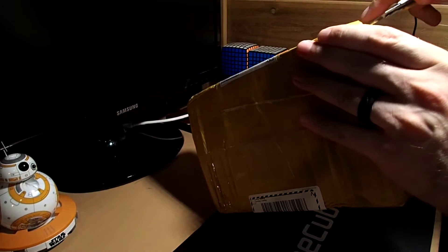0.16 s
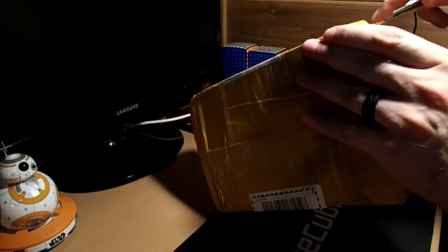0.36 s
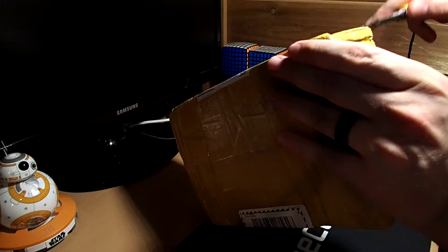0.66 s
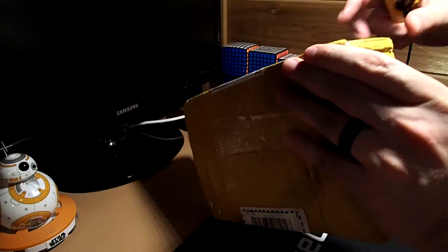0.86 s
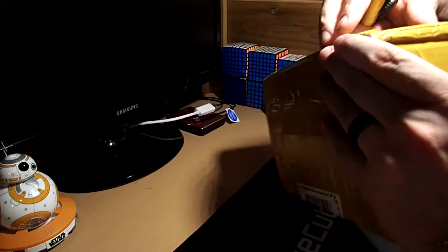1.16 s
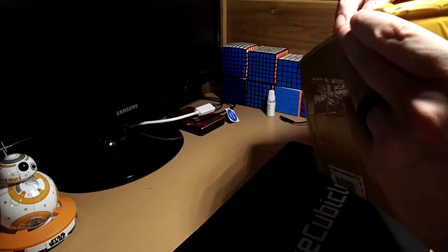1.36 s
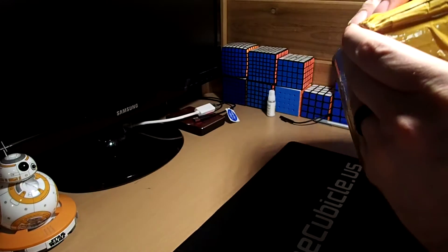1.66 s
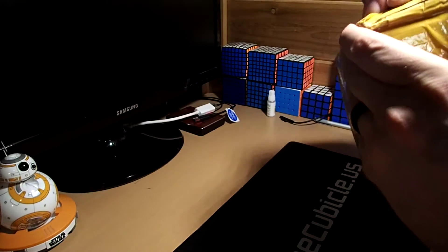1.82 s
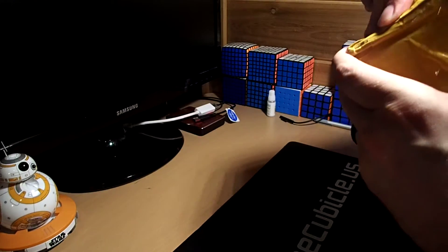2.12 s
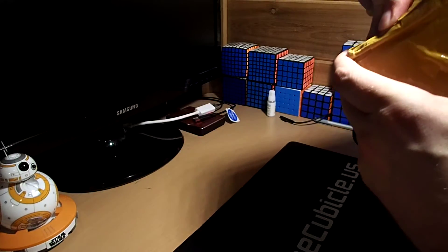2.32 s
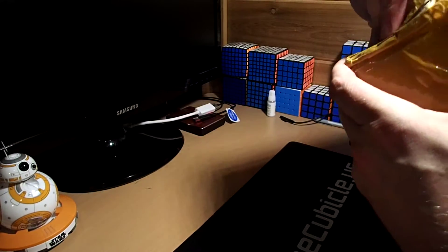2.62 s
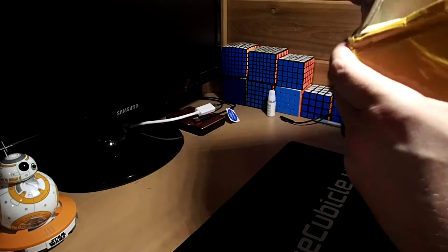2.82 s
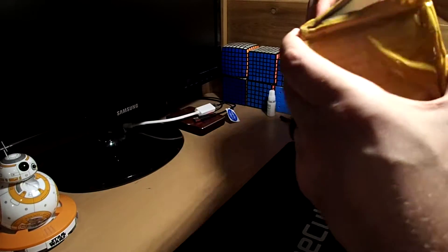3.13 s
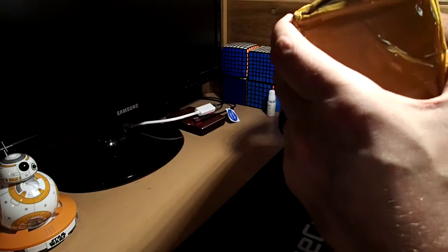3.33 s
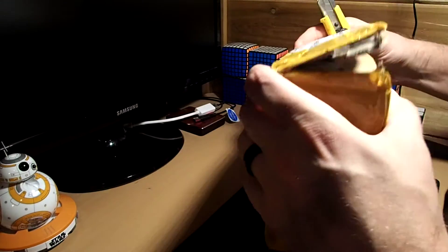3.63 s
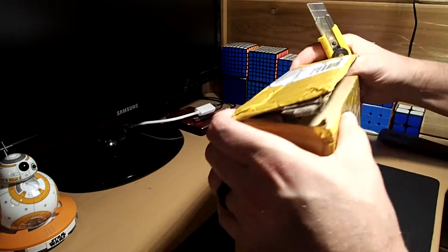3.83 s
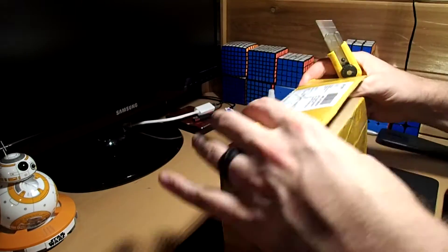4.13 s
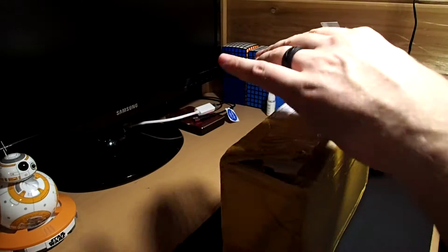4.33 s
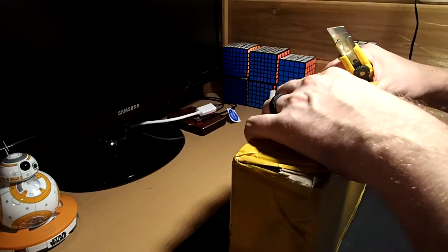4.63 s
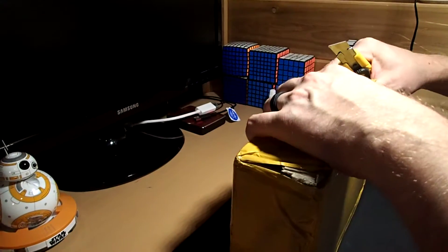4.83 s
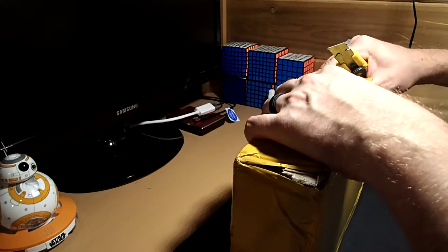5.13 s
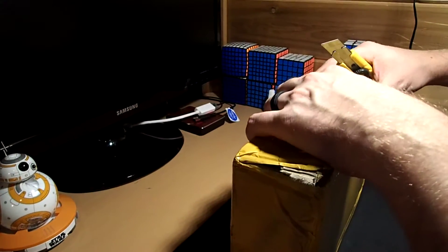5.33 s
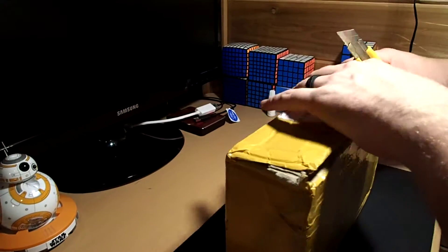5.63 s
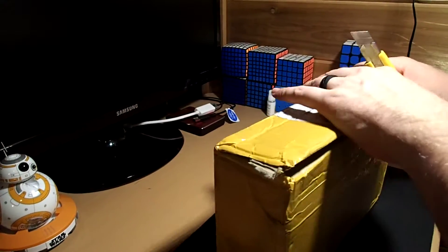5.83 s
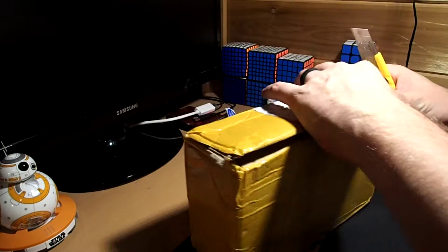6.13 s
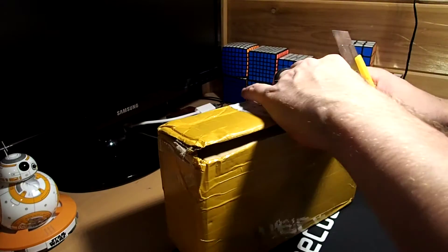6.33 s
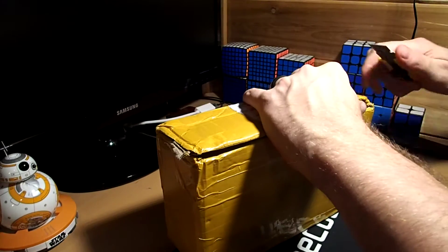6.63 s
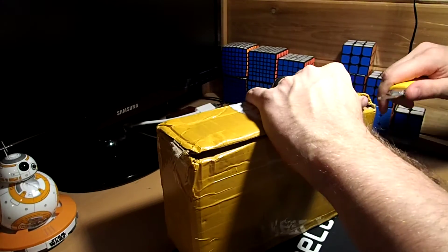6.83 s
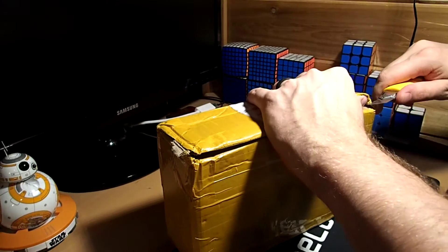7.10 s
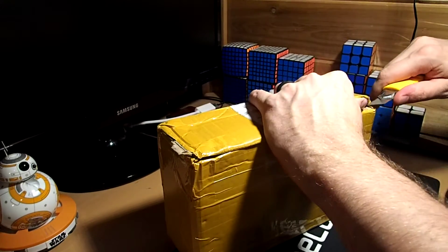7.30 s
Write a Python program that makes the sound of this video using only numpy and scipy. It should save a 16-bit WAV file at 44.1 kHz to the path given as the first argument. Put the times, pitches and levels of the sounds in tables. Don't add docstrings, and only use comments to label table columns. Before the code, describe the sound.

Close to a small stereo microphone in a small room, a blade rips packing tape on a cardboard box: a short tear, scattered snaps, a hard hollow knock, then a denser crackling rip. Hands rustle and slide over the tape. The box bumps softly onto a desk with dry pops, a folded flap creaks slower and slower, and light blade clinks and snaps finish. A faint computer fan runs throughout.

```python
import sys
import numpy as np
from scipy import signal
from scipy.fft import rfft, irfft
from scipy.io import wavfile
from scipy.ndimage import uniform_filter1d

SR = 44100
rng = np.random.default_rng(int(sys.argv[2]) if len(sys.argv) > 2 else 0)


def store_pcm(level_fs):
    pcm = np.round(np.clip(level_fs, -1, 1) * 32767).astype(np.int16)
    wavfile.write(sys.argv[1], SR, np.atleast_2d(pcm).T)


def boost_factor(decibels):
    exponent = np.asarray(decibels, float) / 20
    return 10 ** exponent


N = 328986


def unit(x):
    return x / np.sqrt(np.mean(x ** 2))


def colour(x, points):
    hz, db = np.transpose(points)
    bins = np.maximum(np.arange(1025) * SR / 2048, 1)
    cep = irfft(np.log(boost_factor(np.interp(np.log(bins), np.log(hz), db))))
    cep[1:1024] *= 2
    cep[1025:] = 0
    return signal.fftconvolve(x, irfft(np.exp(rfft(cep))))[:len(x)]


def ring(x, modes):
    out = 0
    for k, (hz, width, db) in enumerate(modes):
        b, a = signal.iirpeak(hz, hz / width, fs=SR)
        out = out + (-1) ** k * boost_factor(db) * signal.lfilter(b, a, x)
    return out


def curve(tables, column):
    t = np.arange(N) / SR
    return sum(boost_factor(np.interp(t, rows[:, 0], rows[:, column], -200, -200)) for rows in map(np.array, tables))


def soft_curve(tables):
    return uniform_filter1d(curve(tables, column=1), size=200)


def swells(rows, start_db, end_db):
    return [[(s, a + start_db, b), (s + swell, a, b), (s + swell + fade, a + end_db, b)]
            for s, swell, fade, a, b in rows]


def walk(rate):
    k = int(SR / rate)
    return uniform_filter1d(np.repeat(rng.standard_normal(N // k + 1), k), k)[:N]


def slips(rate, spread_db):
    when = rng.random(N) < rate / SR
    size_db = spread_db * np.minimum(rng.exponential(size=N), 4.5)
    return unit(when * rng.standard_normal(N) * boost_factor(size_db))


def add(track, s, sound):
    i = int(s * SR)
    track[i:i + len(sound)] += sound[:len(track) - i]


def knock(hz, cycles):
    t = np.arange(12000) / SR
    return np.sin(2 * np.pi * hz * t) * np.exp(-t * hz / cycles)


# frequency in Hz, level in dB.
TAPE_TONE = [(1500, -19.5), (2000, -29.5), (3000, -18.5), (4000, -30), (4500, -10), (4850, -7.5),
             (5200, 2.5), (5800, -2.5), (6400, -8.5), (7000, -11.5), (8100, -9), (9200, -21),
             (15300, -32.5), (16200, -24)]


def film(x):
    return colour(x, [(300, -54)] + TAPE_TONE)


# frequency in Hz, width in Hz, level in dB.
BOX_MODES = [(309, 106, 2), (547.5, 79, 2.5), (770, 180, 0.5), (1063, 163, 0), (1282, 180, 0),
             (1520, 235, 2), (2170, 72, -14), (1660, 450, -25.5), (2416, 190, -11), (2850, 240, -13),
             (3900, 500, -23)]
# frequency in Hz, width in Hz, level in dB.
BLADE_MODES = [(2200, 280, -1.5), (3550, 1100, -9)]
# frequency in Hz, level in dB.
SURFACE_TONE = [(3000, -30), (8000, -6), (10000, 0), (15500, -3), (16300, -30)]
SNAP_HZ, BLADE_JAR_DB = 885, -21


def releases(events, shadow=None):
    tape, box, push, steel = np.zeros((4, N))
    t = np.arange(4000) / SR
    for s, db, box_db, hz, blade_db, tail_s in events:
        crack = 0.35 * np.exp(-t / 0.00035)
        crackle = 0.5 * np.exp(-t * np.log(1000) / max(tail_s, 0.005))
        burst = rng.standard_normal(len(t)) * (crack + crackle)
        burst = burst + 2.6 * (t == 0)
        add(tape, s, boost_factor(db) * burst)
        add(push, s, boost_factor(db + box_db) * burst)
        add(steel, s, boost_factor(db + blade_db) * burst)
        add(box, s, boost_factor(db + box_db - 1.5) * knock(hz, cycles=4.0))
        add(box, s, boost_factor(db + box_db - 2.0) * knock(3100, cycles=0.68))
    if shadow:
        tape = boost_factor(11) * film(colour(tape, shadow))
    else:
        tape = boost_factor(11) * film(tape) + boost_factor(-19.0) * colour(tape, SURFACE_TONE)
    return tape + boost_factor(17.5) * ring(push, BOX_MODES) + boost_factor(2.5) * ring(steel, BLADE_MODES) + box


# frequency in Hz, level in dB.
AIR_TONE = [(20, -10), (110, -3.5), (400, -9.5), (700, -14), (1650, -19.5), (1900, -25), (3900, -34.5),
            (4800, -27), (5250, -16.5), (6500, -23), (8000, -18.5), (9300, -24.5), (15500, -28),
            (16500, -68)]
# frequency in Hz, side level in dB over mid.
AIR_SIDE_TONE = [(30, -8), (250, -4.5), (500, -3), (1400, -2), (3000, -2.5), (7000, -1.5), (15000, 0)]
# frequency in Hz, rms level in dB.
FAN_TONES = [(522, -52), (409.7, -63), (117.4, -63), (64, -64.5)]
AIR_DB = -46


def air():
    mid, side = (unit(colour(rng.standard_normal(N), AIR_TONE)) * boost_factor(AIR_DB - 4.5 + 0.93 * walk(1.826))
                 for _ in range(2))
    t = np.arange(N) / SR
    wobble_s = 0.000844 * np.cumsum(walk(4.24)) / SR
    tones = np.zeros(N)
    for hz, db in FAN_TONES:
        level = np.sqrt(2) * boost_factor(db + 0.55 * walk(9.8))
        tones += level * np.sin(2 * np.pi * hz * (t + wobble_s))
    return mid + tones, colour(side, AIR_SIDE_TONE) + 0.013 * tones


# start in seconds, level in dB.
CRACKLE_TIMES = [(0.045, -29), (0.2643, -31), (0.8162, -28), (1.0287, -32.5), (1.533, -31), (1.933, -42),
                 (1.9782, -35), (2.333, -33), (2.349, -27.5), (2.411, -34.5), (2.5005, -27), (2.87, -33.5),
                 (3.185, -39), (3.9672, -30), (4.4006, -34), (4.4525, -28), (4.601, -30), (5.5042, -32),
                 (5.694, -28), (6.0621, -32.5)]


def crackles():
    return releases([(s, db, -31, SNAP_HZ, BLADE_JAR_DB, 0.046) for s, db in CRACKLE_TIMES])


# start in seconds, swell in seconds, fade in seconds,
# tape rustle in dB, box rustle in dB.
HAND_MOVES = [(0.05, 0.11, 0.26, -46, -48), (0.27, 0.13, 0.091, -50.5, -42), (0.55, 0.35, 0.17, -50, -64),
              (1.3, 0.28, 0.17, -51, -53), (1.58, 0.15, 0.26, -42.5, -47.5), (1.93, 0.21, 0.45, -47, -56),
              (2.56, 0.11, .1, -50, -59), (2.76, 0.19, 0.11, -43, -51), (3.0, 0.21, 0.33, -44.5, -48),
              (3.36, 0.17, 0.11, -44.5, -43), (3.46, 0.14, 0.25, -44.5, -47.5),
              (3.66, 0.26, 0.38, -47.5, -76), (3.95, 0.11, 0.1, -65, -45.5), (4.3, 0.21, 0.16, -42, -47.5),
              (4.42, 0.23, 0.16, -38, -38.5), (4.66, 0.13, 0.22, -39.5, -56),
              (5.13, 0.16, 0.23, -38, -42.5), (5.3, 0.2, 1, -46, -58), (5.72, 0.32, 0.17, -49.5, -61),
              (6.45, 0.34, 0.15, -46.5, -54), (7.12, 0.2, 0.16, -40, -44)]


def grip():
    skin = slips(9000, spread_db=1.7) * boost_factor(3.6 * walk(70))
    start_db, end_db = -21.5, -25
    on_tape = [(s, swell, fade, tape_db, 0) for s, swell, fade, tape_db, _ in HAND_MOVES]
    on_box = [(s, swell, fade, box_db, 0) for s, swell, fade, _, box_db in HAND_MOVES]
    rustle = soft_curve(swells(on_tape, start_db, end_db)) * unit(film(skin))
    rustle = rustle + soft_curve(swells(on_box, start_db, end_db)) * unit(ring(skin, BOX_MODES))
    return boost_factor(-3.0) * rustle


# time in seconds, tearing in dB,
# depth into the card as box level in dB over tearing.
RIP_CURVES = [
    [(0.28, -57, 1), (0.345, -33, -3.5), (0.362, -25.5, -6.5), (0.4, -22, -3), (0.44, -20.5, -12),
     (0.458, -18, -3.5), (0.471, -27, 4), (0.478, -43, -8), (0.49, -48, -10)],
    [(2.61, -40, -25), (2.616, -18, -17), (2.638, -16.5, -14), (2.65, -26.5, -10), (2.665, -22.5, -4),
     (2.68, -18, -8), (2.71, -25, -8), (2.722, -33.5, -10), (2.774, -45.5, -26)],
]
# start in seconds, swell in seconds, fade in seconds,
# level in dB, box level in dB over tearing.
SCRAPE_MOVES = [
    (0.135, 0.038, 0.051, -34.5, 0),
    (0.48, 0.009, 0.14, -40.5, -3.5),
    (3.99, 0.035, 0.02, -32, -7.5),
    (4.105, 0.024, 0.054, -42, -4.5),
]
# start in seconds, swell in seconds, fade in seconds,
# level in dB, box level in dB over tearing.
SLIDE_MOVES = [
    (2.335, 0.021, 0.13, -42.5, -32),
    (2.483, 0.033, 0.064, -35, -13),
    (3.28, 0.019, 0.071, -45, -5),
    (3.32, 0.05, .025, -47, -2),
]
# start in seconds, swell in seconds, fade in seconds,
# level in dB, box level in dB over tearing.
GLIDE_MOVES = [
    (3.04, 0.11, 0.071, -34.5, -10),
    (4.11, 0.021, 0.026, -37, -2.5),
    (5.93, 0.16, .26, -45.5, -24),
]
# share of distinct slips from 0 to 1, hiss in dB over tearing.
GRAIN_KINDS = [
    (0.41, -29),
    (0.69, -15),
    (0.25, -23),
    (0.74, -1.5),
    (0.42, -6),
]
# time in seconds, level in dB.
TAUT_CURVE = [
    (0.38, -40),
    (0.42, -32),
    (0.442, -28),
    (0.462, -35),
    (0.474, -41),
]


def strokes():
    kinds = [RIP_CURVES[:1], RIP_CURVES[1:]]
    kinds += [swells(rows, start_db=-16.5, end_db=-11) for rows in (SCRAPE_MOVES, SLIDE_MOVES)]
    kinds += [swells(GLIDE_MOVES, start_db=-13.5, end_db=-4.5)]
    tearing = np.array([soft_curve(kind) for kind in kinds])
    card = soft_curve([[(s, db + box_db) for s, db, box_db in cut] for kind in kinds for cut in kind])
    share, hiss_db = np.transpose(GRAIN_KINDS)
    rough = share[tearing.argmax(axis=0)]
    jerky = unit(slips(3500, spread_db=1.5) * boost_factor(4.0 * walk(250) + 0.8 * walk(40)))
    blade = rough * jerky + (1 - rough) * rng.standard_normal(N)
    out = tearing.sum(axis=0) * unit(film(blade))
    out = out + card * unit(ring(blade, BOX_MODES))
    out = out + soft_curve([TAUT_CURVE]) * unit(ring(blade, [(5850, 900, 0)]))
    hiss = boost_factor(-9.0) * (boost_factor(hiss_db) @ tearing) * unit(colour(blade, SURFACE_TONE))
    return out + hiss


# start in seconds, level in dB,
# box knock in dB over tape, knock pitch in Hz.
KNOCK_HITS = [(0.1437, -26.5, -4.5, 1520), (0.18, -22, -14.5, 1410), (0.3068, -33, -12, 1410),
              (0.4596, -5.5, -6.5, 1370), (0.4622, -14.5, -8, 1560), (0.7226, -40, -3, 1370),
              (1.102, -39.5, -8, 855), (1.2382, -28, -13.5, 1690), (1.4124, -18, -6, 1555),
              (1.7265, -36.5, -7, 870), (2.2204, -0.5, -9.5, 1630), (2.2216, -21.5, 5.5, 1630),
              (2.6717, -19, -1, 710), (3.4627, -26, -16, 1010), (4.0091, -18.5, -15.5, 800),
              (4.0935, -31, -2, 785), (4.6168, -19.5, -14, 715), (4.6462, -22, -13, 770),
              (4.7031, -39, -8, 794), (4.8345, -27, -9, 676), (4.8763, -29, -9.5, 1230),
              (4.9137, -29, -9, 665), (5.242, -32.5, -5, 1210), (5.2955, -34, -10, 1634),
              (5.3119, -23.5, -13, 1060), (6.3792, -39, 2.5, 1480), (6.3955, -38.5, -4, 1150),
              (6.427, -44, -10, 1900), (6.503, -36.5, -6, 800), (6.514, -35, -3, 1520),
              (6.5178, -28, -8, 1690), (6.6318, -36.5, -7.5, 1500), (7.0274, -44, -4, 910)]


def knocks():
    events = []
    for s, db, box_db, hz in KNOCK_HITS:
        tail_s = 0.055 * boost_factor(-0.7968 * (max(db, -32) + 31.5))
        events.append((s, db, box_db, hz, BLADE_JAR_DB, tail_s))
    return releases(events)


# start in seconds, level in dB, box knock in dB over tape, tail in seconds.
SNAP_HITS = [(0.2431, -22.5, -25, 0.058), (1.451, -23, -25, 0.039), (1.5228, -17.5, -24, 0.02),
             (1.5525, -24.5, -33, .008), (1.4219, -22, -17, 0.018), (1.2423, -30, -21, 0.044),
             (1.7967, -24, -42, 0.023), (2.5188, -17, -21, 0.023), (2.53, -18.5, -32, 0.041),
             (2.572, -28.5, -18, 0.063), (2.5875, -26.5, -22, 0.11), (2.6137, -4, -36, .02),
             (2.6226, -9.5, -26, 0.025), (2.6359, -5.5, -20, 0.056), (2.6335, -14.5, -6.5, 0.012),
             (2.7814, -19, -40, 0.013), (0.4245, -9.5, -17, .03), (0.4355, -23, -27, 0.019),
             (0.4392, -13, -30, 0.032), (2.611, -22, -28, .03), (2.6455, -15, -20, 0.025),
             (2.654, -12, -25, 0.027), (2.6763, -14, -24, .03), (2.679, -11, -24, 0.027),
             (2.6865, -13, -16, 0.034), (2.695, -18, -18, .03), (2.7075, -19, -16, 0.029),
             (2.716, -24, -17, .02), (6.4727, -29, -30, 0.018), (6.604, -37, -15, .09),
             (6.763, -28.5, -11, 0.034), (7.3191, -15, -19.5, 0.027), (4.9355, -16.5, -24, 0.026),
             (4.9741, -18, -19.5, 0.078), (5.347, -25, -32, 0.019), (5.678, -23, -37, .03),
             (7.098, -25, -31, 0.026), (7.3283, -23.5, -20, 0.038), (7.344, -28, -20, 0.028)]


def snaps():
    return releases([(s, db, box_db, SNAP_HZ, BLADE_JAR_DB, tail_s) for s, db, box_db, tail_s in SNAP_HITS])


# start in seconds, level in dB, pitch in Hz, decay in cycles.
DESK_BUMPS = [(0.34, -41, 129, 5), (0.399, -39, 150, 4), (0.45, -30, 135, 3.1), (2.221, -39, 157, 1.7),
              (4.975, -41, 89, 1.9), (4.011, -30, 66, 0.87), (4.029, -22, 92, 1.6), (4.058, -27, 67.6, 2),
              (4.094, -28, 78, 1.2), (4.109, -29, 66.4, 1.3), (4.135, -36, 55, 1.3),
              (4.162, -36, 120.6, 2.5), (4.217, -37, 59.3, 1.6), (4.484, -30.5, 99, 1.4),
              (4.548, -39, 123.3, 6.1), (4.618, -41, 82.4, 13), (4.7, -33.5, 96.4, 2.2),
              (4.786, -32, 114.6, 2.5), (5.789, -43.5, 122.4, 5.2)]


def desk():
    top = np.zeros(N)
    for s, db, hz, cycles in DESK_BUMPS:
        sound = knock(hz, cycles) + 0.48 * knock(1.7 * hz, 1.43 * cycles)
        onset = 1 - np.exp(-np.arange(len(sound)) / SR / 0.0017)
        add(top, s, boost_factor(db + 4.0) * sound * onset)
    top = signal.lfilter(*signal.butter(2, 45, "high", fs=SR), top)
    rattling = top * (1 + 0.44 * walk(250))
    return uniform_filter1d(uniform_filter1d(rattling, size=90), size=60)


# start in seconds, level in dB, pitch in Hz.
BOX_TAPS = [(0.456, -16, 363), (0.565, -30, 600), (1.494, -27.5, 413), (1.886, -37, 1050), (2.22, -12, 944),
            (3.284, -32, 988), (3.3, -33, 340), (3.48, -28.5, 322), (3.503, -32, 367), (3.571, -29, 480),
            (3.61, -33, 515), (4.009, -26.5, 276), (5.231, -26.5, 613), (5.321, -31.5, 474),
            (5.521, -32.5, 382), (6.514, -37, 522)]


def taps():
    box, push = np.zeros((2, N))
    for s, db, hz in BOX_TAPS:
        add(box, s, boost_factor(db + 2.5) * knock(hz, cycles=1.23))
        add(push, s, boost_factor(db - 12.5) * np.hanning(12))
    return boost_factor(17.5) * ring(push, BOX_MODES) + box


# start in seconds, level in dB, pitch in Hz, fade in seconds.
WALL_SHIVERS = [
    (2.223, -41.5, 1430, 0.3),
    (2.675, -18.5, 773, 0.092),
    (1.249, -36.5, 1610, 0.042),
    (1.3, -34, 700, .04),
    (4.23, -38.5, 309, 1),
]


def shivers():
    out = np.zeros(N)
    t = np.arange(16000) / SR
    for s, db, hz, fade_s in WALL_SHIVERS:
        buzz = rng.standard_normal(len(t)) * np.exp(-t * np.log(1000) / fade_s)
        add(out, s, ring(buzz, [(hz, 0.069 * hz, db + 19.5)]))
    return out


# start in seconds, level in dB,
# box knock in dB over tape, blade in dB over tape.
KNIFE_CLINKS = [(3.303, -33.5, -0.5, 8.5), (4.031, -29, -13, -18), (5.447, -26, -24, -12),
                (5.6038, -24.5, -11.5, 4), (6.7104, -35.5, -17, 4), (6.757, -27.5, -12, 7),
                (6.9647, -37.5, -10.5, 6), (7.1598, -28.5, -17, 2), (7.1874, -16.5, -24.5, -12),
                (7.21, -24, -18, -1), (7.277, -27, -32, 3), (7.2825, -24, -25, 2.5), (7.3165, -23, -14, 4)]


def clinks():
    return releases([(s, db, box_db, 1270, blade_db, 0.047) for s, db, box_db, blade_db in KNIFE_CLINKS])


# start in seconds, level in dB, box knock in dB over tape, tail in seconds.
FAR_POPS = [
    (3.983, -20, -20.5, 0.064),
    (4.0777, -5.5, -25.5, 0.006),
    (4.7301, -11.5, -22, 0.02),
    (4.7995, -18.5, -20, 0.039),
    (4.0216, -12, -25, .01),
    (7.355, -12, -36, 0.026),
]
# frequency in Hz, level in dB.
BOX_SHADOW = [(4000, 0.5), (6500, -0.5), (9000, -12), (14000, -10)]


def pops():
    events = [(s, db, box_db, SNAP_HZ, BLADE_JAR_DB, tail_s) for s, db, box_db, tail_s in FAR_POPS]
    return releases(events, shadow=BOX_SHADOW)


# time in seconds, slips a second, level in dB.
CREAK_CURVE = [
    (4.485, 125, -63),
    (4.505, 230, -41.5),
    (4.518, 163, -42),
    (4.533, 120, -35.5),
    (4.55, 160, -36.5),
    (4.57, 107, -35.5),
    (4.588, 110, -37),
]
# start in seconds, level in dB.
LAST_SLIPS = [(4.5957, -22.5), (4.605, -22), (4.6149, -25), (4.627, -26), (4.639, -25), (4.65, -24),
              (4.6632, -25.5), (4.681, -24.5), (4.703, -24), (4.724, -28), (4.745, -23), (4.787, -21.5),
              (4.831, -22.5), (4.868, -22), (4.911, -20.5), (4.979, -20.5)]
# frequency in Hz, width in Hz, level in dB.
FLAP_MODES = [(291, 31, 5), (515, 99, 1), (1280, 200, -14), (1658, 62, -7), (2190, 72, -11),
              (2650, 36, -12), (2820, 21, -22), (3020, 120, -7)]


def creak():
    s, rate, _ = np.transpose(CREAK_CURVE)
    speed = np.interp(np.arange(N) / SR, s, rate) * (1 + 0.099 * walk(120))
    jerks = np.diff(np.floor(np.cumsum(speed / SR)), prepend=0)
    jerks = jerks * boost_factor(2.0 * walk(150) + 30.0) * curve([CREAK_CURVE], column=2)
    for s, db in LAST_SLIPS:
        add(jerks, s + 0.00273, boost_factor(db + 14.0) * np.ones(1))
    t = np.arange(400) / SR
    chatter = signal.fftconvolve(jerks, rng.standard_normal(len(t)) * np.exp(-t / 0.0022))[:N]
    chatter = colour(chatter, [(500, -22), (1200, 0), (2200, -8), (3200, -11), (4200, -25)])
    push = np.convolve(jerks, np.hanning(21) / 1.8)[:N]
    flap = boost_factor(4.0) * ring(push, FLAP_MODES) + boost_factor(-18.0) * push
    return flap + boost_factor(-17) * film(jerks) + boost_factor(-35.0) * chatter


def echoes(x, t60_s):
    t = np.arange(int(0.6 * SR)) / SR
    tail = rng.standard_normal(len(t)) * np.exp(-t * np.log(1000) / t60_s)
    return signal.fftconvolve(x, tail / np.sqrt(np.sum(tail ** 2)))[:N]


# frequency in Hz, side in dB over mid.
PORT_TONE = [(35, -1), (70, -8), (300, -32), (1000, -26.5), (3000, -22), (5000, -9), (9000, -4.5),
             (13000, 0.5)]
ROOM_T60_S, ROOM_DB, ROOM_HZ = 0.15, -9, 5740
BOX_LOW_HZ = 133


def scene():
    ticks = crackles() + knocks() + snaps() + clinks() + pops() + taps()
    box = ticks + grip() + strokes() + shivers() + creak()
    small = signal.butter(2, BOX_LOW_HZ, "high", fs=SR)
    near = signal.lfilter(*small, box) + desk()
    dull = signal.lfilter(*signal.butter(1, ROOM_HZ, fs=SR), near)
    near = near + boost_factor(ROOM_DB) * echoes(dull, ROOM_T60_S)
    turn = 3.58 * walk(9.1)
    apart = np.cos(turn) * echoes(near, t60_s=0.016) + np.sin(turn) * echoes(near, t60_s=0.012)
    mid, side = air()
    side = side + colour(apart, PORT_TONE) - 0.039 * near
    return np.array([near + mid + side, near + mid - side])


def band_limit(x):
    return signal.sosfilt(signal.butter(12, 16700, fs=SR, output="sos"), x)


def record(dry):
    heard = signal.sosfilt(signal.butter(2, 30, "high", fs=SR, output="sos"), dry)
    heard = np.tanh(heard)
    heard = signal.sosfilt(signal.ellip(6, 0.3, 50, 16000, fs=SR, output="sos"), heard)
    return band_limit(heard)


dry = scene()
out = record(dry)
store_pcm(out)
```